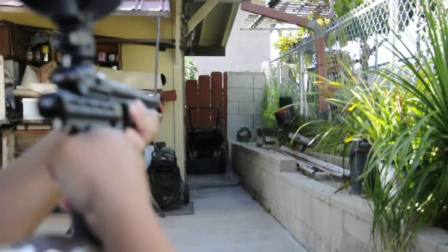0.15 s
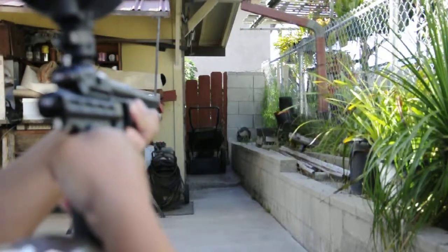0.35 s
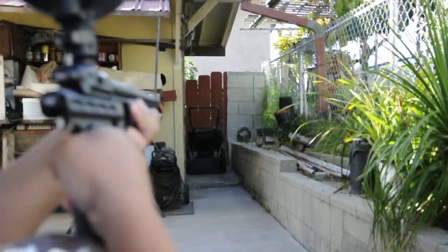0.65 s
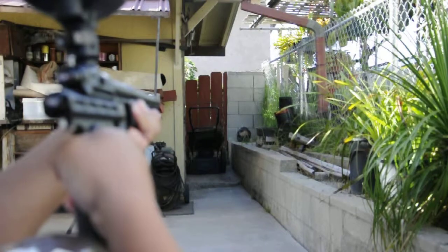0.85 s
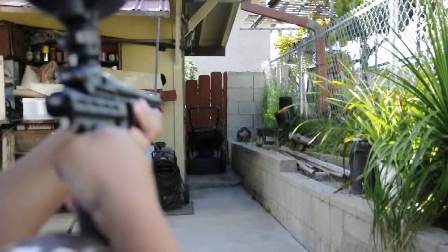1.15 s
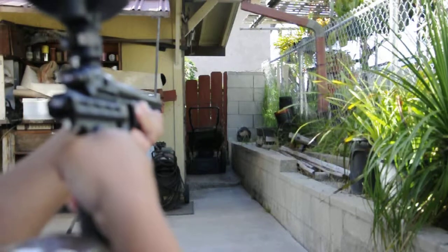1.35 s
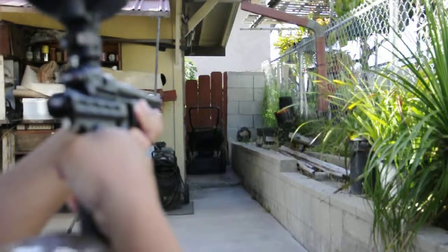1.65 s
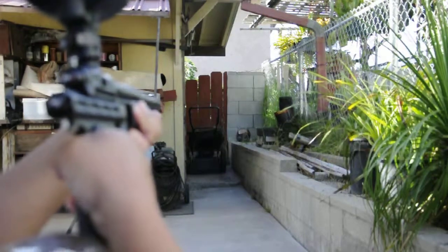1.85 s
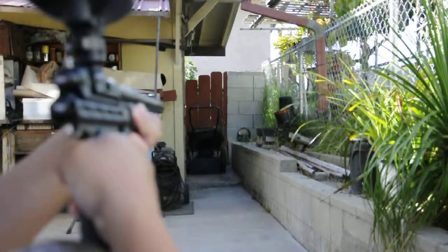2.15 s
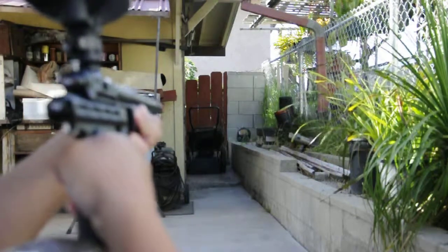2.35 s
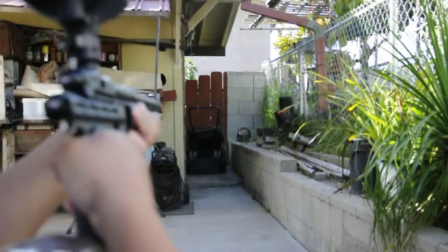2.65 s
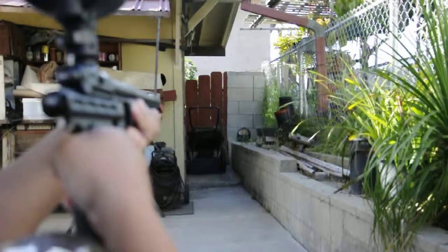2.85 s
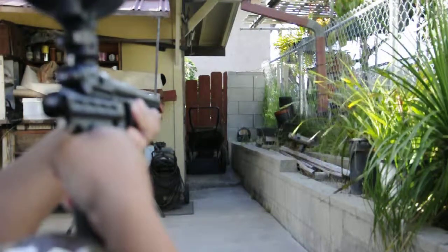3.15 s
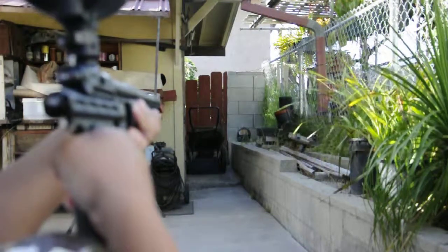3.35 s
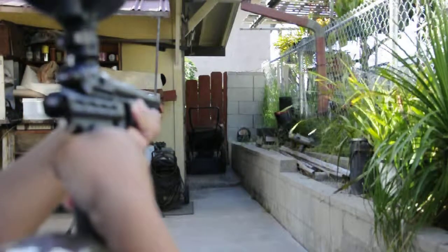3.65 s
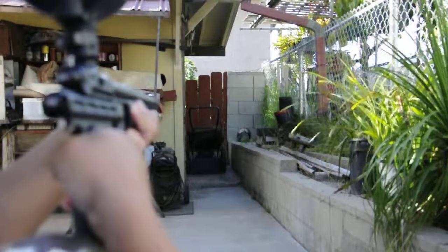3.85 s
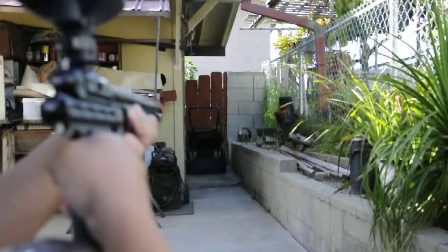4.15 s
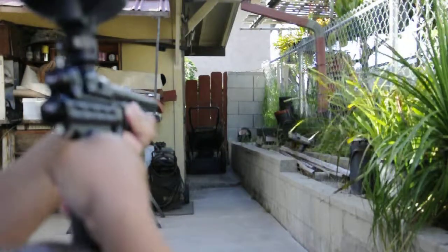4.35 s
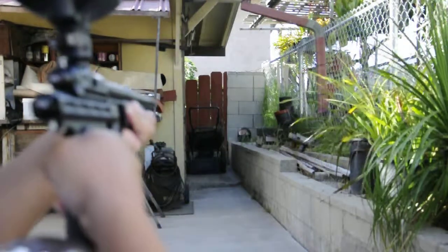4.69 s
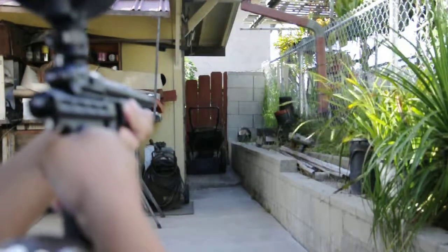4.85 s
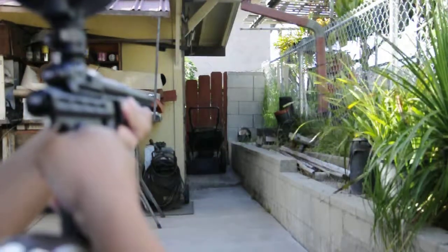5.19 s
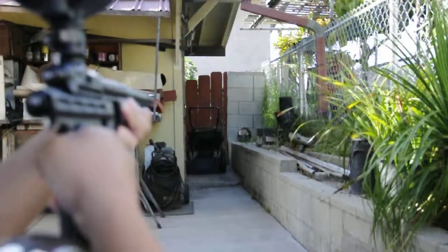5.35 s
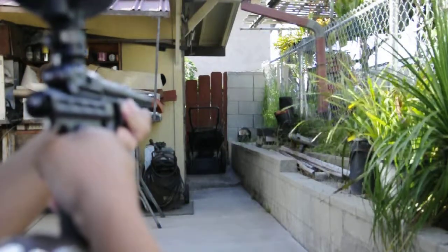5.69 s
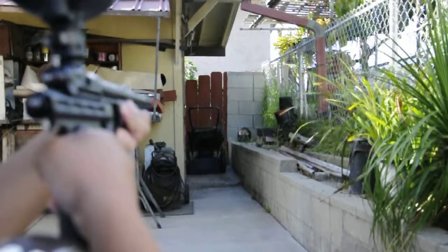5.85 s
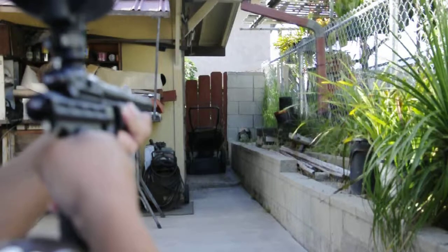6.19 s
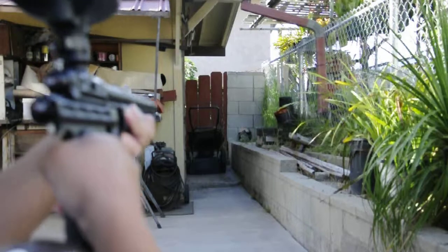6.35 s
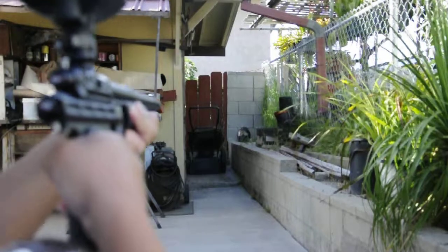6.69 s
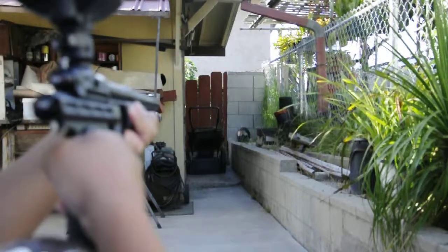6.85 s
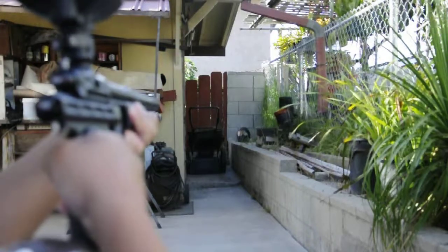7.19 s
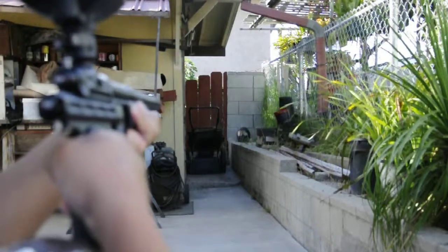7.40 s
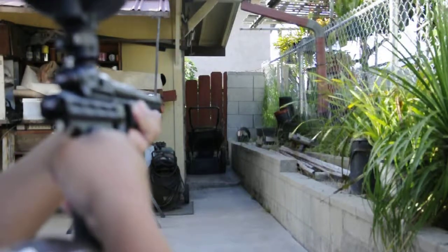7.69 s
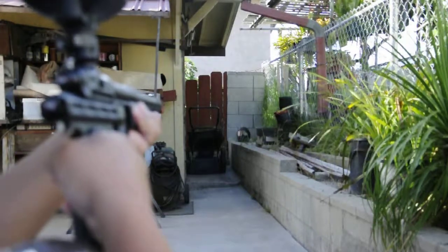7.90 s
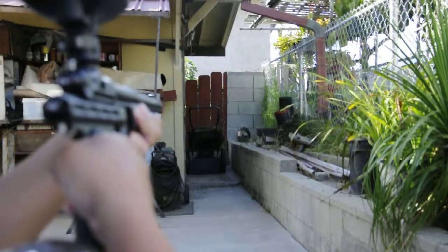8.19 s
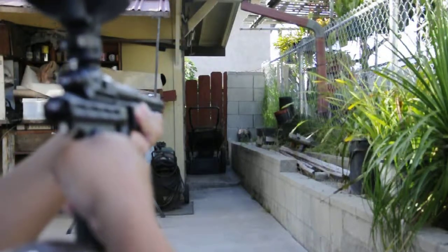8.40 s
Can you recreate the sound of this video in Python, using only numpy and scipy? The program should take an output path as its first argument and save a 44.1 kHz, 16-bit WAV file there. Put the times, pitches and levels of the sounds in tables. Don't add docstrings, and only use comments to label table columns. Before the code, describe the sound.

Four overloaded air-gun pops in a walled yard, each with a quick hollow target smack, metallic pump racking between, and wind thumping the microphone.

```python
import sys
import numpy as np
from scipy import signal
from scipy.fft import rfft, irfft, next_fast_len
from scipy.io import wavfile
from scipy.ndimage import uniform_filter1d

SR = 44100
rng = np.random.default_rng(int(sys.argv[2]) if len(sys.argv) > 2 else 0)


def boost_factor(decibels):
    exponent = np.asarray(decibels, float) / 20
    return 10 ** exponent


def output_pcm(signal):
    pcm = np.clip(np.atleast_2d(signal).T, -1, 1) * 32767
    wavfile.write(sys.argv[1], SR, np.round(pcm).astype(np.int16))


N = 376173


def unit(x):
    return x / np.sqrt(np.mean(x ** 2))


def peak(x, db):
    return x * boost_factor(db) / np.abs(x).max()


def curve(table):
    return np.interp(np.arange(N) / SR, *np.transpose(table))


def colour(x, table):
    hz, db = np.transpose(table)
    size = next_fast_len(len(x))
    bin_hz = np.arange(size // 2 + 1) * SR / size
    gain = boost_factor(np.interp(np.log(bin_hz + 1), np.log(hz), db))
    return irfft(rfft(x, size) * gain, size)[:len(x)]


def noise(n, table):
    return unit(colour(rng.standard_normal(n), table))


def fade(t, t60):
    return np.exp(-np.log(1000) * t / t60)


def add(out, s, x):
    i = max(int(s * SR), 0)
    out[i:i + len(x)] += x[:N - i]


def ring(t, modes, spread_db):
    out = np.zeros(len(t))
    for hz, width_hz, db in modes:
        gain = boost_factor(db + spread_db * rng.standard_normal())
        detune = 1 + 0.033 * rng.standard_normal()
        out += gain * np.exp(-np.pi * width_hz * t) * np.sin(2 * np.pi * hz * t * detune)
    return out


# (time [s], level [dB])
HUSH_DB = [(0, -56), (1.4, -58), (3.4, -60.5), (5.3, -54), (7.2, -55.5), (8.53, -59)]
# (frequency [Hz], density [dB per Hz])
HUSH = [(180, -33), (300, -18.5), (343, -17.5), (673, -13), (733, -23.5), (881, -15.5), (1340, -21.5),
        (4020, -28.5), (5600, -30), (7280, -75), (12300, -120)]


def suburban_hush():
    return boost_factor(curve(HUSH_DB) + 4) * noise(N, HUSH)


# (time [s], length [s], start [Hz], end [Hz], level [dB])
NEAR_CHIRPS = [
    (4.714, 0.035, 3700, 3550, -51),
    (4.716, .04, 2200, 2250, -59),
    (4.718, .04, 4350, 4500, -48),
    (4.742, 0.05, 2600, 2600, -49),
    (4.742, 0.048, 5050, 5250, -49),
    (4.749, 0.04, 4550, 4850, -50),
    (4.775, .02, 5700, 5600, -54),
    (4.822, 0.05, 5000, 4870, -47.5),
]
# (time [s], length [s], start [Hz], end [Hz], level [dB])
FAR_CHIRPS = [
    (0.922, 0.043, 4500, 4470, -64),
    (7.462, 0.04, 5300, 4900, -57),
    (7.592, 0.04, 3900, 4500, -57),
    (7.605, 0.04, 5000, 5400, -57),
    (7.751, 0.064, 3450, 3950, -54),
    (7.754, 0.06, 4550, 4250, -53),
    (7.808, 0.077, 3970, 3840, -53),
    (7.815, 0.06, 4500, 4400, -51),
]
NEAR_HOARSE_HZ, FAR_HOARSE_HZ, CHIRP_DB = 170, 290, -1.5


def sparrows():
    out = np.zeros(N)
    for calls, hoarse_hz in ((NEAR_CHIRPS, NEAR_HOARSE_HZ), (FAR_CHIRPS, FAR_HOARSE_HZ)):
        for s, length_s, start_hz, end_hz, db in calls:
            t = np.arange(int(length_s * SR)) / SR
            jitter = unit(uniform_filter1d(rng.standard_normal(SR // 8), size=40))
            wobble_hz = hoarse_hz * jitter[:len(t)]
            wobble_hz = wobble_hz - uniform_filter1d(wobble_hz, size=400)
            glide_hz = start_hz + (end_hz - start_hz) * t / length_s
            phase = 2 * np.pi * np.cumsum(glide_hz + wobble_hz) / SR
            add(out, s, boost_factor(db + CHIRP_DB) * np.sin(np.pi * t / length_s) ** .5 * np.sin(phase))
    t = np.arange(SR // 2) / SR
    echo = boost_factor(-27) * rng.standard_normal(len(t)) * fade(t, .38)
    return out + signal.fftconvolve(out, echo)[:N]


# (frequency [Hz], density [dB per Hz])
EDGE = [(250, -27.5), (450, 12), (700, 7), (1100, -3), (2000, -24), (5000, -52)]


def turbulence():
    return noise(N, EDGE)


def eddy(grit, db, hz, edge_db, phase, cycles):
    t = np.arange(-600, 601) / SR
    thump = np.exp(-(t * hz / cycles) ** 2) * np.cos(2 * np.pi * hz * t + phase)
    crest = grit[rng.integers(N - len(t)):][:len(t)] * np.exp(-(t / 0.0033) ** 2)
    return boost_factor(db) * (thump + boost_factor(edge_db + 1.0) * crest)


# (time [s], level [dB])
GUST = [(0.0, -30), (0.62, -33), (0.97, -40), (1.28, -28.5), (1.92, -51), (2.73, -27.5), (3.06, -33.5),
        (3.47, -31), (3.68, -31), (4.11, -29.5), (4.3, -36), (5.32, -31), (5.63, -39), (6.58, -21.5),
        (6.82, -34), (8.15, -32.5), (8.34, -35), (8.53, -52.5)]
# (frequency [Hz], density [dB per Hz])
RUMBLE = [(13, -41.5), (22, -12.5), (112, -0.5), (206, -1), (294, -5.5), (469, -15.5), (747, -27),
          (900, -36.5), (1170, -60.5), (1980, -120)]


def breeze(grit):
    patter = np.zeros(N)
    for u in rng.random((550, 4)):
        db, hz = -4 * np.log(u[1]), 70 * 4.0 ** u[2]
        add(patter, u[0] * N / SR, eddy(grit, db, hz, -23.5, 2 * np.pi * u[3], 0.83))
    flicker = boost_factor(6.06 * unit(uniform_filter1d(rng.standard_normal(N), size=1500)))
    rumble = unit(colour(rng.standard_normal(N), RUMBLE) * flicker)
    return boost_factor(curve(GUST)) * boost_factor(-1) * (unit(patter) + rumble)


def shed(grit, s, db, hz, edge_db, u):
    parts = [(s, eddy(grit, db - 2.0, hz, edge_db, 2 * np.pi * u[0, 0], 0.18 + 0.57 * u[0, 1]))]
    for a, b, c, d in u[1:]:
        lag_s = (0.004067 + .011 * a) * np.sign(b - .3)
        small = eddy(grit, db - 9 - 9 * c, hz * 1.7 ** (2 * d - 1), edge_db, 40 * b, .5)
        parts.append((s + lag_s, small))
    return parts


# (time [s], peak [dB], pitch [Hz], sharp edge [dB])
EDDIES = [(0.146, -1.5, 243, -14), (0.158, -5.5, 318, -11.5), (0.207, -0.5, 237, -26), (0.36, -2, 311, -22),
          (0.389, 2, 307, -22.5), (0.461, 2, 269, -19.5), (0.481, 5.5, 343, -17), (0.93, -3.5, 210, -30),
          (1.256, -4.5, 258, -21.5), (1.297, -2, 321, -23.5), (2.185, -10, 229, -23), (2.824, -4, 265, -25),
          (3.009, 0.5, 288, -31), (3.043, 0.5, 272, -23.5), (3.194, -4, 189, -21),
          (3.387, -0.5, 290, -29.5), (3.517, -1.5, 265, -23.5), (3.542, -4, 332, -28.5),
          (4.79, -6, 208, -20.5), (4.894, -8, 264, -46), (5.036, -1.5, 210, -25.5), (5.336, -4, 298, -18),
          (5.409, -5, 234, -27), (5.649, -13, 187, -30), (5.911, -2, 256, -18.5), (6.505, 2, 335, -29.5),
          (7.443, -5, 290, -22.5), (7.62, -2.5, 260, -17), (7.835, -3.5, 195, -25), (8.206, 3, 255, -21)]
# (start [s], length [s], peak [dB], spacing [s])
FLURRIES = [(0.074, 0.16, -11, 0.029), (0.308, 0.076, -11, .04), (0.514, 0.018, -13, 0.015),
            (.61, 0.035, -9.5, 0.017), (0.687, .14, -11, 0.026), (0.948, 0.023, -12, 0.018),
            (1.128, 0.18, -11.5, .025), (1.269, 0.067, -10, 0.011), (1.554, 0.0049, -13, 0.019),
            (2.12, 0.034, -13, 0.019), (2.402, 0.022, -11.5, .012), (2.523, 0.059, -11, 0.015),
            (2.609, 0.12, -7.5, 0.028), (2.798, 0.078, -10.5, 0.019), (2.962, 0.038, -10, 0.023),
            (3.17, 0.084, -6.5, 0.025), (3.3, 0.11, -6, .02), (3.458, 0.18, -6, 0.028),
            (3.877, 0.096, -9, 0.019), (4.062, 0.12, -11.5, .025), (4.549, 0.1, -15, 0.024),
            (4.74, 0.022, -13.5, 0.022), (5.066, 0.097, -12.5, 0.022), (6.324, 0.056, -16, .03),
            (6.415, 0.097, -3.5, .015), (6.513, 0.11, -9, .018), (6.663, .13, -13, 0.034),
            (7.037, .31, -14, .047), (7.402, 0.24, -9, 0.03), (8.022, 0.19, -11.5, 0.055)]
SHED_HZ, SHED_HZ_PER_DB, SHED_SCATTER_DB = 290, 6, 2
EDGE_DB, EDGE_PER_DB, EDGE_SCATTER_DB = -22.5, 0.45, 9
ROAR_DB, ROAR_FADE_S = -20, .025


def wind(grit):
    out, swell, t = np.zeros(N), np.zeros(N), np.arange(N) / SR
    parts = []
    for row in EDDIES:
        parts += shed(grit, *row, rng.random((4, 4)))
    for start, length, db, spacing in FLURRIES:
        z, u = rng.standard_normal(size=(7, 3)), rng.random(size=(7, 3, 4))
        uneven = .6 * (u[:, 0, 2] - .5) * (np.arange(7) > 0)
        times = spacing * (np.arange(7) + uneven)
        size_db = db + SHED_SCATTER_DB * z[:, 0]
        hz = np.clip(SHED_HZ + SHED_HZ_PER_DB * size_db, 120, 400) * 1.192 ** z[:, 1]
        edge_db = EDGE_DB + EDGE_PER_DB * size_db + EDGE_SCATTER_DB * np.tanh(z[:, 2])
        lull_db = 3000 * np.maximum(times - length, 0)
        for k in range(len(times)):
            parts += shed(grit, start + times[k], size_db[k] - lull_db[k], hz[k], edge_db[k], u[k])
        end = start + length
        gate = np.interp(t, [start - ROAR_FADE_S, start, end, end + ROAR_FADE_S], [0, 1, 1, 0])
        swell += boost_factor(db + ROAR_DB) * min(0.026 / spacing, 1) ** 2 * gate
    for s, x in parts:
        add(out, s - 600 / SR, x)
    return out + swell * (noise(N, RUMBLE) + boost_factor(-22) * grit)


# (time [s], peak [dB])
SNAPS = [(0.156, -43), (0.389, -38), (0.4615, -31), (0.4755, -36), (0.483, -33), (3.0071, -36),
         (3.0425, -39), (3.1911, -41), (3.2064, -39), (3.2251, -42), (3.3856, -41), (5.0315, -41),
         (7.6254, -40.5)]


def membrane_snaps():
    out, t = np.zeros(N), np.arange(-100, 100) / SR
    for s, db in SNAPS:
        add(out, s - .0023, boost_factor(db) * rng.standard_normal(len(t)) * np.exp(-(t / 0.0004) ** 2))
    return out


# (frequency [Hz], density [dB per Hz])
ECHO = [(88, -60.5), (150, -36.5), (226, -9.5), (604, -7.5), (693, -1), (1010, -2), (1110, -1), (1330, -3),
        (4010, -8), (5600, -15), (7280, -60), (12300, -120)]
# (frequency [Hz], width [Hz], level [dB])
HOLLOWS = [(890, 420, 7), (1340, 600, -6.5), (2080, 90, -4)]


def yard(x, early_db, early_t60, late_db, late_t60):
    t = np.arange(SR) / SR
    hiss = noise(SR, ECHO)
    dull = signal.sosfiltfilt(signal.butter(1, 1800, fs=SR, output="sos"), hiss)
    hiss = dull + (hiss - dull) * fade(t, 2.2)
    boom = unit(signal.fftconvolve(rng.standard_normal(SR), ring(t[:2000], HOLLOWS, 1.3))[:SR])
    grainy = boost_factor(1.6 * unit(uniform_filter1d(rng.standard_normal(SR), size=90)))
    early = hiss * boost_factor(early_db) * fade(t, early_t60)
    late = (hiss + boost_factor(-6.5) * boom) * boost_factor(late_db) * fade(t, late_t60)
    onset = np.clip(t / 0.0022, 0, 1)
    return signal.fftconvolve(x, (early + late) * grainy * onset)[:N]


# (time [s], peak [dB], knock [dB], knock [Hz], clack [dB])
PUMP = [(2.0056, -3.5, -23.5, 1055, -17.5), (2.0374, -11, -39, 873, -20), (2.0553, -17, -8, 618, -19),
        (2.2051, -6.5, -19, 695, -14.5), (2.3051, -15, -9, 550, -10), (4.1706, -7.5, -21, 737, -15),
        (4.251, -7.5, -26, 685, -24), (4.2621, -5.5, -11.5, 576, -14.5), (4.4304, -1.5, -31, 1080, -17),
        (4.5365, -21.5, -8, 590, -13), (6.3855, -3.5, -26, 636, -11.5), (6.4329, -11, -14.5, 880, -18.5),
        (6.4527, -18.5, -2.5, 475, -12), (6.6218, -7, -30, 460, -15.5), (6.7307, -24.5, -11, 592, -10.5)]
# (frequency [Hz], density [dB per Hz])
CLACK = [(500, -27.5), (900, 4), (1500, -3.5), (2700, 2), (3600, -21.5)]
# (frequency [Hz], density [dB per Hz])
TICK = [(2000, -27.5), (3200, 0.5), (4000, 2.5), (5000, 4.5), (7000, -5.5)]
# (frequency [Hz], width [Hz], level [dB])
STEEL = [(1250, 14, -13), (2630, 60, -8), (3700, 200, 0), (4650, 250, 1.5)]
RATTLE_T60_S = 0.097


def pump():
    out, kick, t = np.zeros(N), np.zeros(N), np.arange(SR // 6) / SR
    rise = np.clip(t / 0.0024, 0, 1)
    shake = rise * (fade(t, 0.007) + boost_factor(-22) * fade(t, RATTLE_T60_S))
    for s, db, knock_db, knock_hz, clack_db in PUMP:
        tick = unit(colour(rng.standard_normal(len(t)) ** 3, TICK)) * shake
        clack = unit(colour(rng.standard_normal(len(t)) ** 3, CLACK)) * shake
        steel = rise * ring(t, STEEL, 3)
        knock = rise * ring(t, [(knock_hz, 70, 0), (1.6 * knock_hz, 120, -5)], 1.2)
        metal = peak(tick, 0) + peak(clack, clack_db + 3.5) + peak(steel, -27.5)
        add(out, s - .001, boost_factor(db + 6) * metal + peak(knock, db + knock_db + 7))
        add(kick, s, boost_factor([db]))
    return out + yard(kick, -31, 0.06, -34.5, 0.6)


# (time [s], peak [dB], spatter [dB], echo [dB])
SMACKS = [
    (1.701, 0.5, -6, 1.5),
    (3.762, -1.5, -4.5, 2.5),
    (6.039, -7.5, -5, 1.5),
    (8.341, 1.5, -9.5, 1.5),
]
# (frequency [Hz], width [Hz], level [dB])
TARGET = [(607, 29, -16), (800, 56, -7), (1760, 56, -0.5), (2140, 290, 10), (2724, 150, -12.5),
          (4500, 370, 5)]
# (frequency [Hz], density [dB per Hz])
SPATTER = [(180, -53), (300, -30.5), (567, 6.5), (1020, -5.5), (1530, -6), (3230, -9), (5080, -17.5),
           (5600, -31.5), (7280, -62), (12300, -120)]


def target():
    out, kick, t = np.zeros(N), np.zeros(N), np.arange(SR // 5) / SR
    for s, db, spatter_db, echo_db in SMACKS:
        spatter = noise(len(t), SPATTER) * fade(t, 0.069) * np.clip(t / 0.012, 0, 1)
        blows = rng.standard_normal(len(t)) ** 3 * fade(t, .03) * boost_factor(-30)
        blows[0] = 1
        body = signal.fftconvolve(blows, ring(t, TARGET, 0.9))[:len(t)]
        add(out, s, peak(body, db - 0.5) + boost_factor(db + spatter_db + 2.0) * spatter)
        add(kick, s, boost_factor([echo_db]))
    thin = signal.sosfilt(signal.butter(2, 420, "high", fs=SR, output="sos"), out)
    return thin + yard(kick, -21.5, 0.029, -28.0, 0.76)


# (time [s], peak [dB], echo [dB])
SHOTS = [
    (1.582, -0.5, -1),
    (3.649, -4.5, 0),
    (5.923, -3, 1),
    (8.228, -3, -6),
]
# (frequency [Hz], density [dB per Hz])
BLAST = [(71, -25.5), (120, -7), (471, -1.5), (704, -5.5), (1380, -6.5), (2800, -15), (3090, -10),
         (4060, -15), (5000, -11), (5600, -20.5), (7280, -51), (12300, -120)]
PUFFS = [(0, -2.5), (.0055, 6), (.0105, -15)]
PUSH_HZ, PUSH_DB, PUSH_T60_S = 265, -6.5, 0.028


def marker():
    out, kick, t = np.zeros(N), np.zeros(N), np.arange(SR // 5) / SR
    puffs = sum(boost_factor(g) * (t >= d) * fade(np.abs(t - d), 0.0082) for d, g in PUFFS)
    valve = boost_factor(-10.5) * fade(t, 0.27) * np.exp(-(t / 0.14) ** 4)
    push = fade(t, PUSH_T60_S) * np.sin(2 * np.pi * PUSH_HZ * t)
    for s, db, echo_db in SHOTS:
        add(out, s + .0009, boost_factor(db + 1.0) * noise(len(t), BLAST) * (puffs + valve))
        add(out, s + .003, boost_factor(db + PUSH_DB) * push)
        hammer = rng.standard_normal(len(t)) * (t < .007)
        add(out, s - .0055, boost_factor(db - 32.5) * hammer)
        add(kick, s, boost_factor([echo_db]))
    return out + yard(kick, -22.0, 0.32, -25, 0.29)


def duck(loud, start, depth_db, back_s):
    keep = np.exp(-1 / (back_s * SR))
    over = signal.lfilter([1], [1, -keep], np.maximum(np.abs(loud) - start, 0))
    return boost_factor(-depth_db * np.tanh(over / 8))


def scene():
    grit = turbulence()
    near = marker() + target() + pump()
    gusts = wind(grit) + breeze(grit) * duck(near, 0.37, 5.5, 0.11)
    gusts = .76 * np.tanh(gusts / .76) + membrane_snaps()
    hush = suburban_hush() * duck(near + gusts, 0.45, 12, 0.11)
    return (near + gusts + sparrows() + hush)[None]


def roll_off(x):
    return signal.sosfilt(signal.butter(12, 16470, fs=SR, output="sos"), x)


TOP_HZ = 5470
COARSE = 4


def record(dry):
    opening = np.clip(np.arange(N) / (.03 * SR), 0, 1)
    x = np.clip(dry * opening, -.9, .9)
    x = signal.sosfilt(signal.butter(1, 30, "high", fs=SR, output="sos"), x)
    x = signal.sosfiltfilt(signal.butter(6, TOP_HZ, fs=SR, output="sos"), x)
    x = COARSE * x * (np.arange(N) % COARSE == 0)
    x = signal.sosfiltfilt(signal.cheby2(8, 40, 6680, fs=SR, output="sos"), x)
    x = x - 0.034 * x ** 5
    return roll_off(np.clip(x, -.72, .72))


dry = scene()
out = record(dry)
output_pcm(out)
```